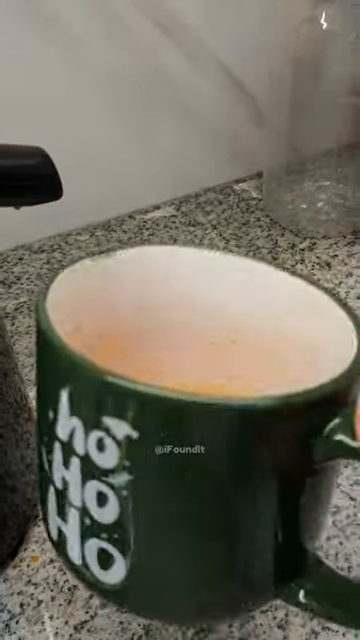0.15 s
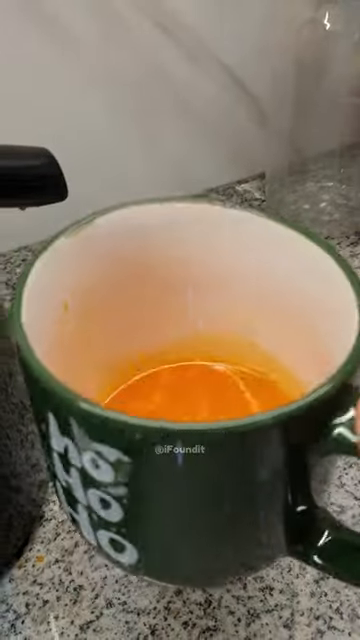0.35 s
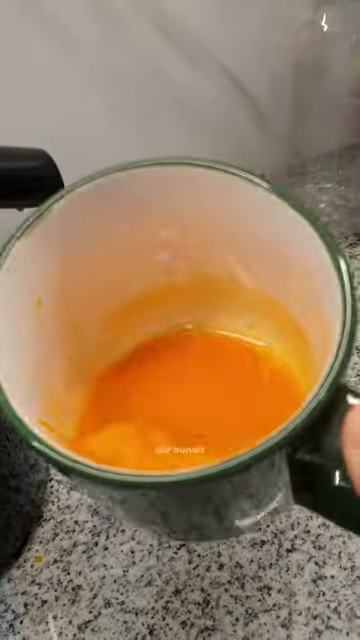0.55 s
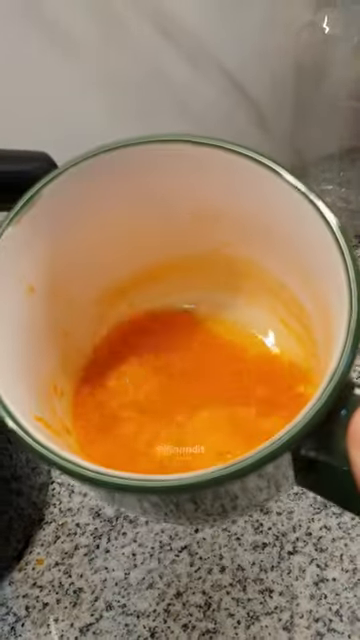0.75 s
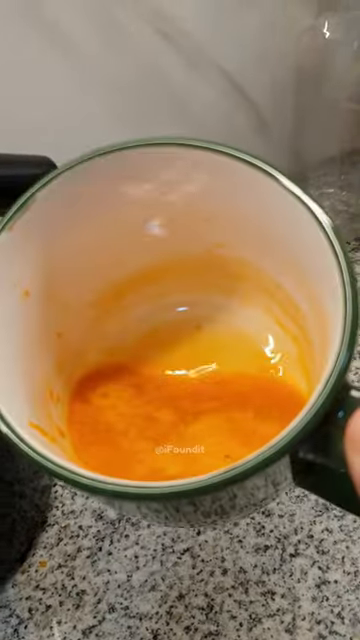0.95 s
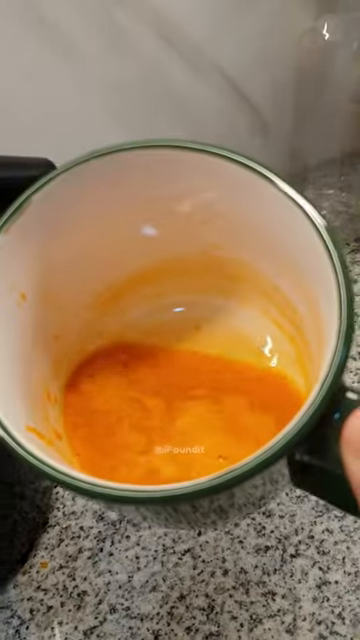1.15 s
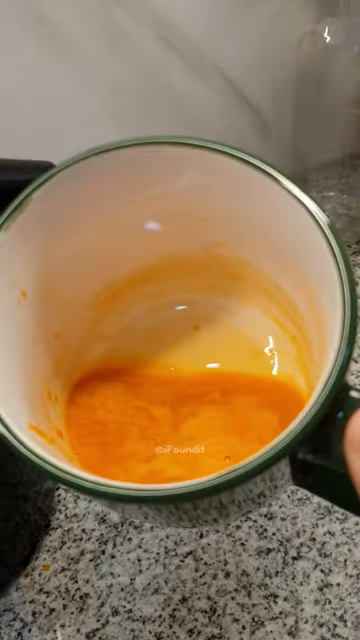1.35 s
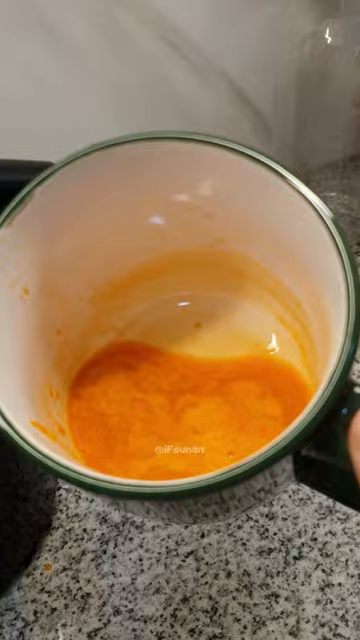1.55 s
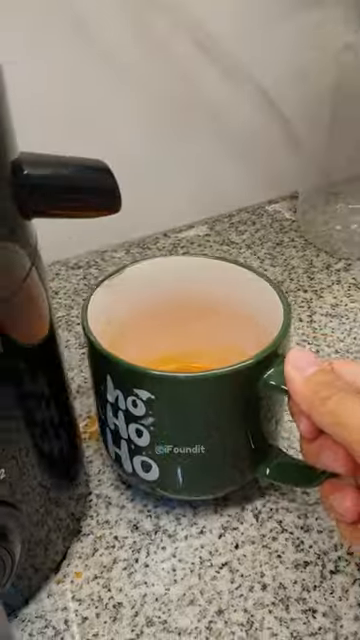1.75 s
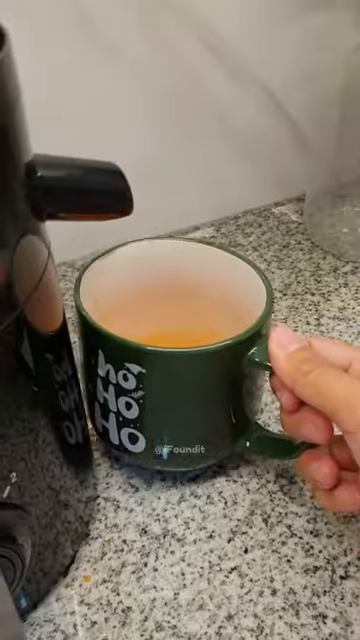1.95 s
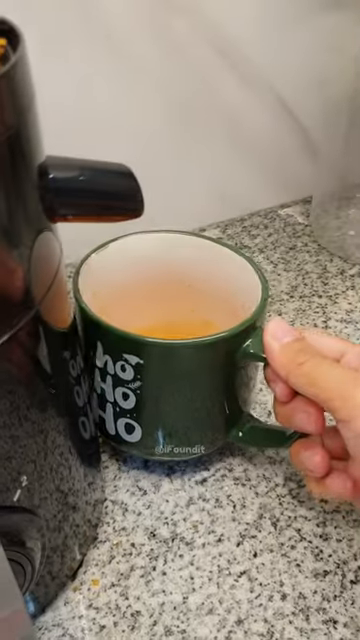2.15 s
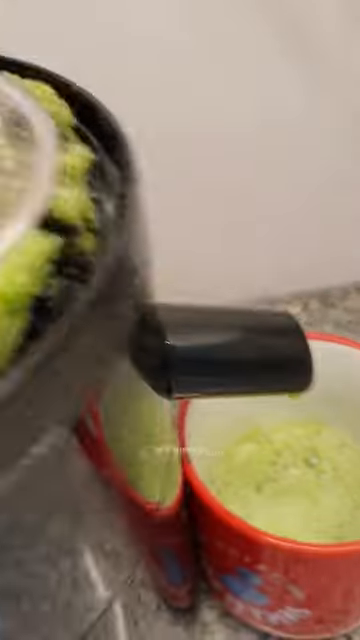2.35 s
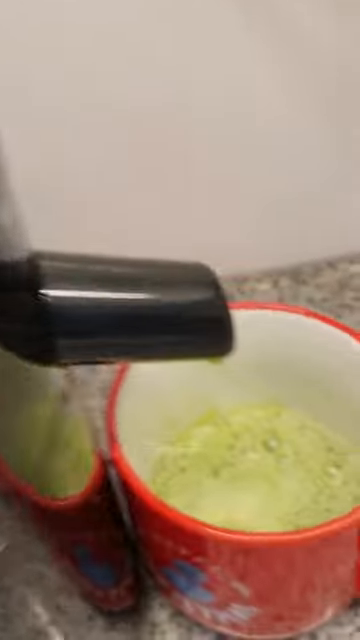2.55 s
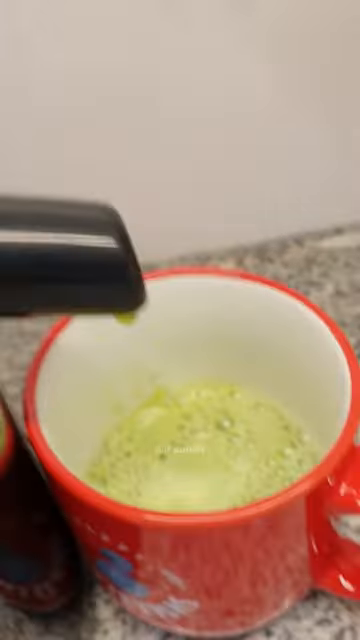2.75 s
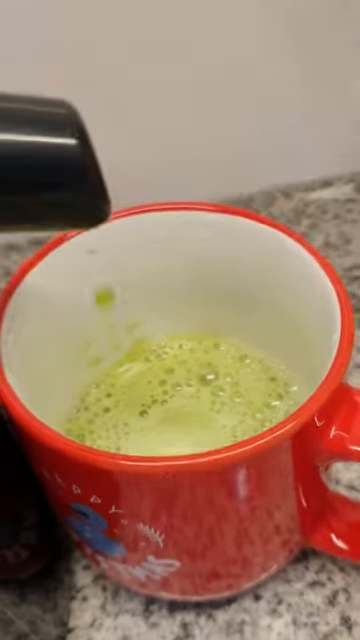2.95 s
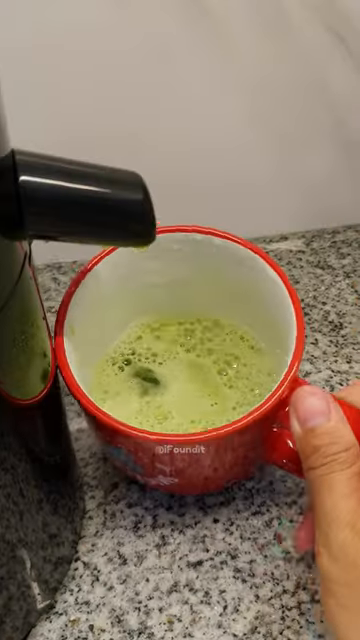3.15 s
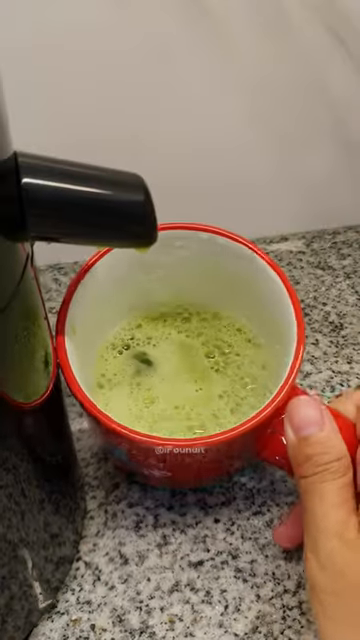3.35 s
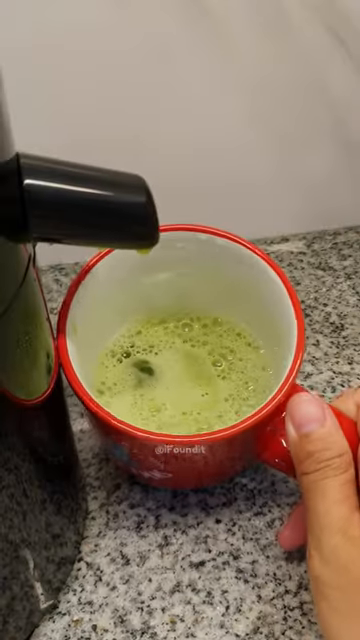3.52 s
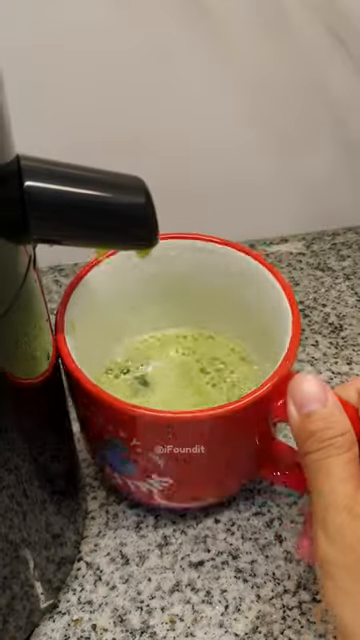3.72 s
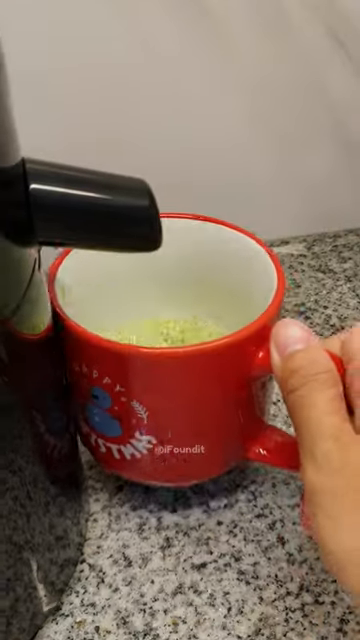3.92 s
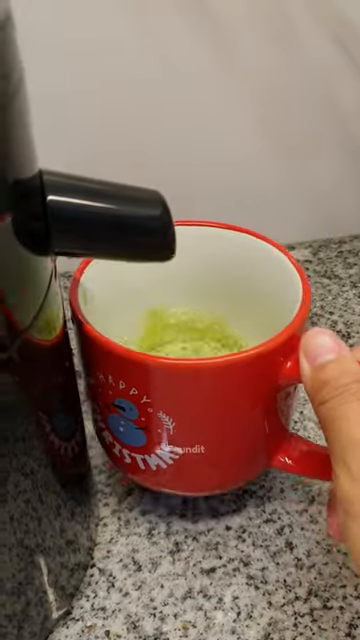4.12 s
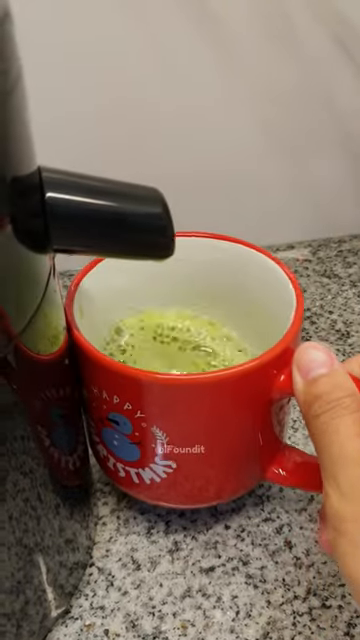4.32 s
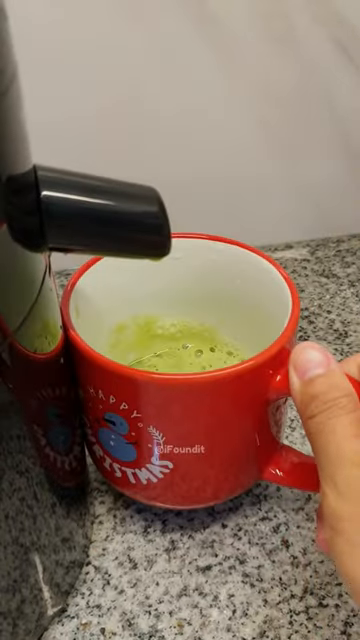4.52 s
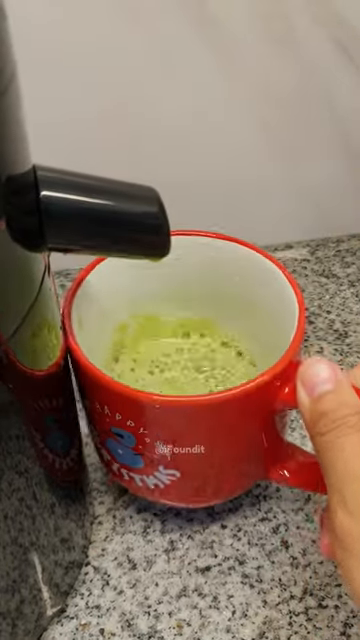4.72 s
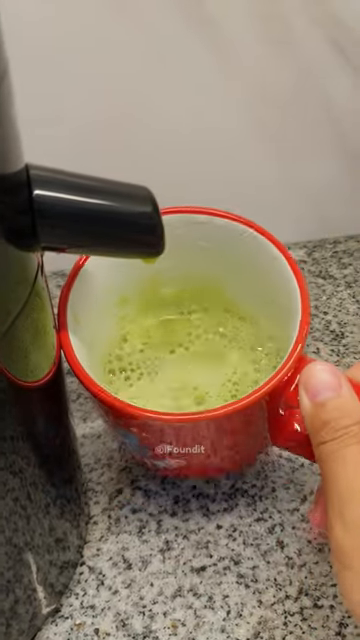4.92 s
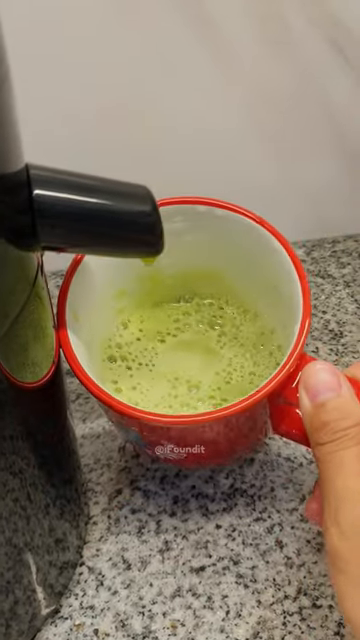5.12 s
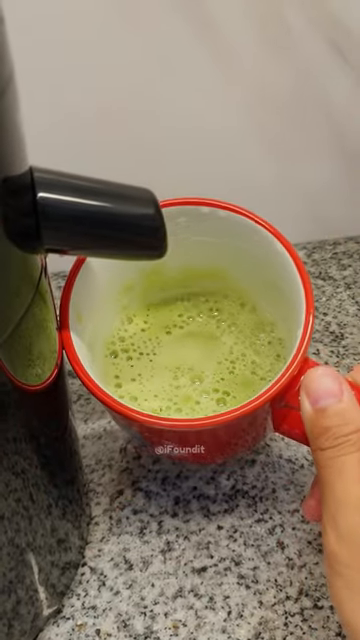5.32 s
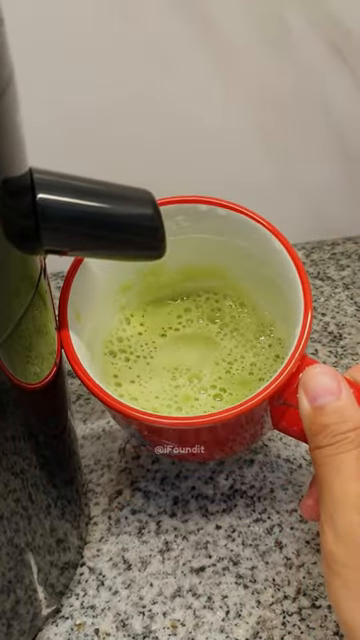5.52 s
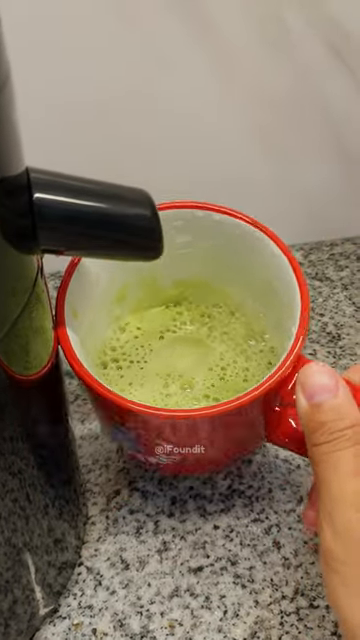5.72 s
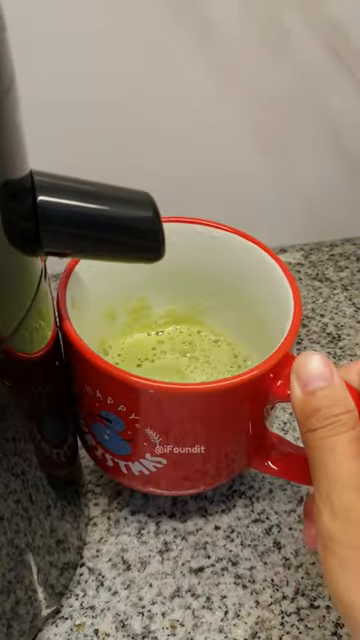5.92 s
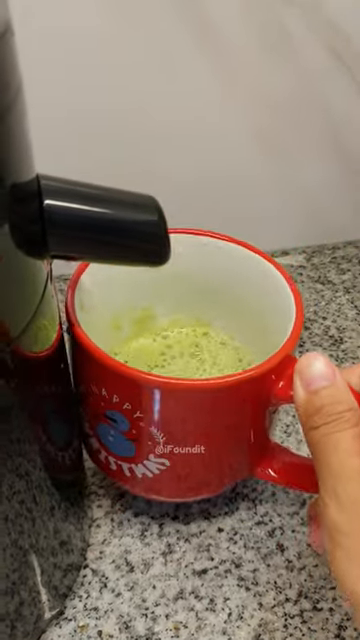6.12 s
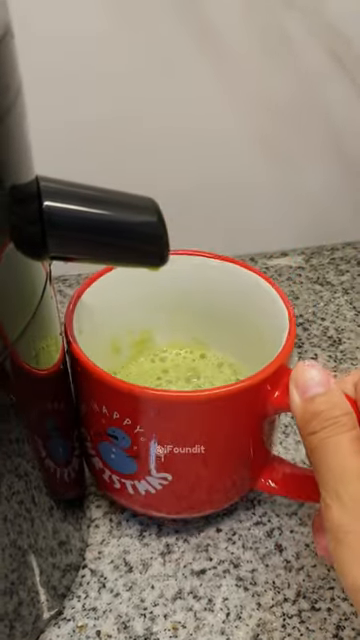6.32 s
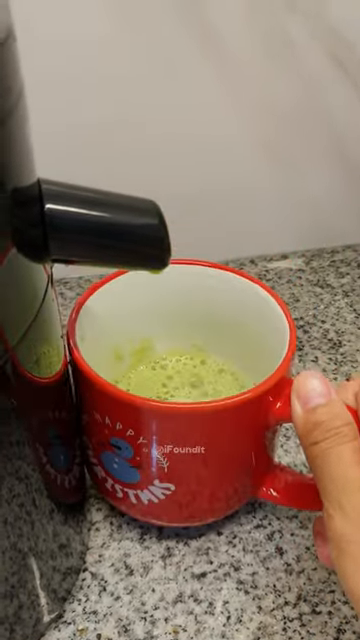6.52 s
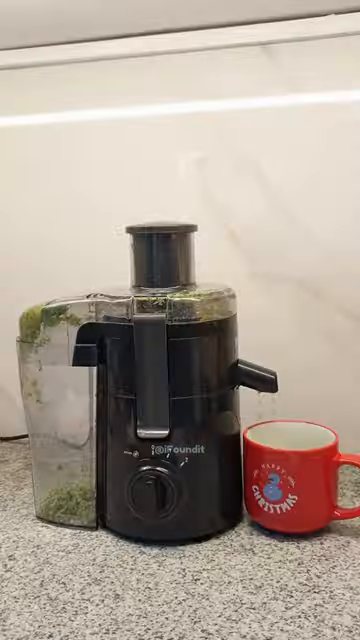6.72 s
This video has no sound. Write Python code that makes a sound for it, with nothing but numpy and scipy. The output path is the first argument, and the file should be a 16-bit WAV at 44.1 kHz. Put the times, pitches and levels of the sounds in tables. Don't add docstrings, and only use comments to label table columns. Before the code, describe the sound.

Soft microphone hiss, low rumble and a thin fridge hum underlie close mug handling on a stone counter. After a quiet opening come bright ceramic taps and a muted bump, then gritty little drags and a cluster of solid knocks with a boomy cabinet undertone. A long near-quiet stretch with faint rubbing leads to one hard ceramic slam and rattling bounces, heard close with short kitchen reverberation.

```python
import sys
import numpy as np
from scipy import signal
from scipy.fft import rfft, irfft
from scipy.io import wavfile
from scipy.ndimage import uniform_filter1d

SR = 44100
rng = np.random.default_rng(int(sys.argv[2]) if len(sys.argv) > 2 else 0)


def bounce(signal):
    frames = np.transpose(np.atleast_2d(signal))
    limited = np.clip(frames, -1, 1)
    pcm = np.round(limited * 32767).astype(np.int16)
    wavfile.write(sys.argv[1], SR, pcm)


def gain_from_db(level_db):
    decades = np.asarray(level_db, float) / 20
    return 10 ** decades


N = 298551


def evened(x):
    return x / np.sqrt(np.mean(x ** 2) + 1e-20)


def read(points, hz):
    f, value = np.transpose(points)
    return np.interp(np.log(hz + 1), np.log(f + 1), value)


def highpass(x, order, hz):
    return signal.sosfilt(signal.butter(order, hz, "high", fs=SR, output="sos"), x)


def ring(modes, size):
    t = np.arange(size) / SR
    return sum(gain_from_db(db - 60 * t / t60) * np.sin(2 * np.pi * hz * t) for hz, db, t60 in modes)


def colour(x, points, tilt_db=0.):
    hz = np.fft.rfftfreq(len(x), 1 / SR)
    gain_db = read(points, hz) + tilt_db * np.log2(hz / 3000 + .01)
    return irfft(rfft(x) * gain_from_db(gain_db), len(x))


def rub(size, hz, width_hz):
    b, a = signal.iirpeak(hz, hz / width_hz, SR)
    grains = rng.standard_normal(30000)[:size]
    return evened(signal.lfilter(b, a, signal.lfilter(b, a, grains)))


def noise(points, same_points, lean_points, patchy_db, size):
    hz = np.fft.rfftfreq(size, 1 / SR)
    a, b, c, d, patches = rng.standard_normal((4 * N // size + 5, len(hz), 5)).T
    patches = evened(uniform_filter1d(uniform_filter1d(patches, size=5, axis=0), size=6, axis=1))
    same = read(same_points, hz)[:, None]
    lean = gain_from_db(read(lean_points, hz) / 2)[:, None]
    left, other = a + 1j * b, c + 1j * d
    right = same * left + np.sqrt(1 - same ** 2) * other
    z = np.array([left * lean, right / lean])
    z = z * gain_from_db(read(points, hz)[:, None] + patchy_db * patches)
    out = signal.istft(z, nperseg=size, noverlap=size - size // 4)[1][:, :N]
    return out / np.std(out.mean(0))


CUTS = [0, 1.75, 2.393, 3.224, 6.657, 7]


def until_cut(s, size):
    left_s = min(c for c in CUTS if c > s) - s - np.arange(size) / SR
    return np.clip(left_s / .002, 0, 1)


def by_shot(levels_db):
    shot = np.searchsorted(CUTS, np.arange(N) / SR, "right") - 1
    return uniform_filter1d(gain_from_db(levels_db)[shot], size=90)


def add(mix, s, sound, lean_db):
    part = mix[:, round(s * SR):][:, :sound.shape[-1]]
    size = part.shape[1]
    part += sound[..., :size] * until_cut(s, size) * gain_from_db(np.array([[lean_db / 2], [-lean_db / 2]]))


# f/Hz, level/dB per Hz
HISS = [(20, -26.5), (38, -7), (60, 4.5), (168, -12.5), (193, -19.5), (420, -13), (574, -26), (2260, -30),
        (6000, -40), (9000, -48), (10800, -37), (13500, -35), (15700, -38.5), (15950, -74.5)]
# f/Hz, likeness/1
HISS_SAME = [(60, 0.74), (180, 0.85), (550, 0.22), (1650, 0.03), (4970, 0.075), (15000, 1)]
# f/Hz, left-right/dB
HISS_LEAN = [(60, -10.5), (180, -5.5), (550, -4.5), (1650, 2.5), (4970, 1.5), (15000, 1.5)]
# f/Hz, level/dB per Hz
RUMBLE = [(12, -39.5), (20, -28.5), (45, 1), (80, 5), (140, -3), (229, -11.5), (323, -19), (455, -15),
          (630, -33.5), (1500, -42), (3300, -51.5)]
SHOT_RUMBLE_DB = [-97, -71.5, -59.5, -61.5, -82.5]
# t/s, half length/s, level/dB
PASSES = [(2.903, 0.5, -64), (4.45, 0.25, -59), (5.952, 1, -60.5)]


def background():
    hiss = noise(HISS, HISS_SAME, HISS_LEAN, patchy_db=2.9, size=1024)
    far = noise(RUMBLE, [(20, .95)], [(20, -1.2)], patchy_db=2.5, size=2048)
    t = np.arange(N) / SR
    passes = sum(gain_from_db(db) * np.exp(-((t - s) / half) ** 2) for s, half, db in PASSES)
    passes = passes * (t < CUTS[-2])
    return gain_from_db(-67.5) * hiss + far * np.hypot(by_shot(SHOT_RUMBLE_DB), passes)


SHOT_HUM_DB = [-72.5, -66, -67, -65.5, -100]


def fridge():
    hum_hz, lean_db, waver_rad, flutter_db = 357, -17.5, 0.13, -1.5
    waver, flutter = (evened(uniform_filter1d(v, size=6000)) for v in rng.standard_normal((2, N)))
    phase = 2 * np.pi * hum_hz * np.arange(N) / SR + waver_rad * waver
    line = np.sqrt(2) * np.sin(phase) * gain_from_db(flutter_db * flutter)
    return 1.526 * line * by_shot(SHOT_HUM_DB) * gain_from_db(np.array([[lean_db], [0]]))


# t/s, peak level/dB, scuff
# t60/s, brightness/dB per octave, left-right/dB
SLAPS = [(1.755, -43, 0.031, 3, 6), (2.139, -31.5, 0.072, -0.5, -1), (2.3883, -59.5, 0.051, -0.5, -1),
         (3.357, -64, 0.054, 3, 5), (3.2204, -45.5, 0.042, 2.5, -1.5), (4.0094, -21, 0.085, 0, 2),
         (4.3237, -23, 0.09, -0.5, -3), (4.3496, -24, 0.04, -1.5, 1), (4.5232, -37.5, 0.16, -2.5, -1.5),
         (4.563, -41, 0.023, -3, -12), (4.736, -42, 0.11, -3.5, -8), (6.4466, -10.5, 0.055, -3.5, 5.5)]
# f/Hz, level/dB per Hz
SLAP_COLOUR = [(240, -21), (500, -8), (700, -8), (1050, 5), (1450, -10.5), (2200, -7), (2850, -3),
               (3500, -12), (4350, -11), (5500, -17.5), (8500, -22), (11500, -18.5), (15500, -36),
               (16500, -72)]


def slaps():
    out, t = np.zeros((2, N)), np.arange(8192) / SR
    for s, db, t60, bright_db, lean_db in SLAPS:
        grit = rng.standard_normal((2, len(t))) * gain_from_db(2.03 * rng.exponential(1, len(t)))
        shared, own = (evened(colour(g, SLAP_COLOUR, bright_db)) for g in grit)
        ports_grit = shared + 0.43 * own * np.array([[1], [-1]])
        rise = np.minimum(t / 0.0027, 1)
        add(out, s, gain_from_db(db - 9.5 - 60 * t / t60) * rise * ports_grit, lean_db)
    return out


def mug(taps, pair, wall, contact_s):
    tick_db = -10
    out, t = np.zeros((2, N)), np.arange(6000) / SR
    for s, db, hz, lean_db, hard_db in taps:
        width_s = contact_s * gain_from_db(-.3 * hard_db)
        push = np.exp(-(t[:100] / width_s - 2.5) ** 2)
        detune = rng.uniform(0.93, 1.015, len(wall))
        low, high = ([(hz * ratio, d, t60)] for ratio, d, t60 in pair)
        upper_modes = [(f * k, d + hard_db, t60) for (f, d, t60), k in zip(wall, detune)]
        upper = ring(upper_modes, len(t)) * (1 - np.exp(-t / 0.00091))
        upper = highpass(upper, 2, 800)
        clink = np.convolve(ring(low, len(t)) - ring(high, len(t)) - upper, push)
        clink[:len(push)] -= gain_from_db(tick_db + 2 * hard_db) * push * push.sum()
        add(out, s - 2.5 * width_s, gain_from_db(db) * clink / abs(clink).max(), lean_db)
    return out


# t/s, peak level/dB, main ring f/Hz, left-right/dB, upper-mode hardness/dB
GREEN_TAPS = [(1.757, -26.5, 762, 2.5, 8), (1.765, -34.5, 1048, 0, 2.5), (1.777, -28.5, 840, 4, 0),
              (1.79, -37, 900, 0, -8), (1.801, -39, 878, -1.5, -5.5), (1.86, -20, 855, -3.5, -3),
              (1.888, -55, 867, -2, -27.5), (1.917, -26.5, 857, -4, -13), (1.984, -36.5, 864, -3, -28.5),
              (1.995, -43.5, 814, -1, -28), (2.006, -40, 822, -5, -29), (2.193, -35, 844, -4.5, -11.5)]
NUDGES = [(2.141, -38, 454, -11.5, -23)]
# ratio to main ring/1, level/dB, t60/s
GREEN_PAIR = [(.945, 2, 0.048), (1.054, 10, 0.029)]
# f/Hz, level/dB, t60/s
GREEN_WALL = [(1290, -15, 0.031), (1320, 1.5, .025), (1545, -17, 0.072), (1910, -9, 0.056),
              (2012, -15.5, 0.032), (2370, -17, 0.023), (2700, -22, 0.025)]


def green_mug():
    return mug(GREEN_TAPS + NUDGES, GREEN_PAIR, GREEN_WALL, contact_s=0.0001)


# t/s, length/s, f/Hz, width/Hz, level/dB
WHISPERS = [(1.757, 0.043, 5970, 1190, -78), (1.986, 0.084, 10400, 1390, -76.5),
            (2.351, 0.032, 10000, 1500, -82.5), (2.7, .28, 610, 90, -75), (3.141, 0.083, 6930, 1146, -78.5),
            (3.171, 0.14, 4140, 984, -71), (4.93, 0.099, 7940, 406, -92), (5.201, 0.2, 8200, 300, -94.5),
            (6.036, 0.21, 3530, 700, -83.5), (6.075, 0.11, 4075, 60, -76.5),
            (6.728, 0.019, 3470, 200.3, -81)]


def whispers():
    glaze_hz, glaze_width_hz, glaze_db, glaze_t60_s = 9900, 980, -46.5, .05
    glaze_share = 0.73
    out, t = np.zeros((2, N)), np.arange(6000) / SR
    for s, length_s, hz, width_hz, db in WHISPERS:
        size = int(length_s * SR)
        swell = signal.windows.tukey(size, 0.15)
        add(out, s, gain_from_db(db) * rub(size, hz, width_hz) * swell, -1.5)
    for s, db, *_ in GREEN_TAPS:
        decay = gain_from_db(glaze_db + glaze_share * db - 60 * t / glaze_t60_s)
        add(out, s, decay * rub(len(t), glaze_hz, glaze_width_hz), -1.5)
    return out


# t/s, blow level/dB, low, middle, high cabinet mode level/dB
BOOMS = [(1.7601, -47, -14, -15.5, -1.5), (2.018, -51.5, 3, 0.5, -1.5), (2.142, -37, -7.5, 2, -11),
         (3.36, -45.5, -6, 19.5, 6), (4.012, -21.5, -11, 0, 2.5), (4.322, -27, -13.5, -2.5, 5),
         (4.351, -26.5, -5.5, -9.5, -3.5), (4.525, -32.5, -4.5, 1.5, -2), (4.565, -43, 2, 6.5, -26),
         (4.734, -35, -4.5, 2, -26), (4.781, -41.5, -17, -4, -5), (6.447, -39.5, -3, -6, 8),
         (6.499, -39.5, -15.5, 14.5, 12), (6.56, -32.5, -10.5, 7, 5)]
# t/s, blow level/dB
JUDDER = [(5.985, -40.5), (6.003, -36), (6.022, -38), (6.045, -39)]
# low, middle, high cabinet mode level/dB
JUDDER_MODES_DB = (-9, 11, -17)
# f/Hz, t60/s
CABINET = [
    (120, 0.41),
    (166, 0.21),
    (284, 0.15),
]
# f/Hz, level/dB, t60/s
PANELS = [(95, -17, 0.094), (143.1, -8, 0.27), (200.8, -6.5, 0.11), (367.3, -9.5, 0.1), (227.3, -3.5, 0.11),
          (467.7, -24, 0.26)]


def booms():
    green_blow_s, red_blow_s = .004, 0.012
    out, t = np.zeros((2, N)), np.arange(20000) / SR
    jolts = [(*jolt, *JUDDER_MODES_DB) for jolt in JUDDER]
    for s, db, *shares_db in BOOMS + jolts:
        modes = [(hz, d, t60) for (hz, t60), d in zip(CABINET, shares_db)] + PANELS
        boom = np.zeros(len(t))
        for mode, lag in zip(modes, rng.integers(0, 150, len(modes))):
            boom += rng.choice([-1, 1]) * np.roll(ring([mode], len(t)), lag)
        boom *= np.minimum(t / (green_blow_s if s < CUTS[2] else red_blow_s), 1)
        add(out, s, gain_from_db(db) * boom / abs(boom).max(), .5)
    return out


# t/s, peak level/dB, main ring f/Hz, left-right/dB, upper-mode hardness/dB
RED_TAPS = [(3.358, -33.5, 860, -2.5, -24), (3.365, -33.5, 940, 11.5, -26), (4.011, -38, 970, -5, 1),
            (4.324, -37.5, 1130, 7, 1), (4.531, -56, 1124, -4, -9), (4.741, -48.5, 830, 8, -38),
            (6.447, -1, 945, -1.5, -6), (6.465, -35, 922, 6.5, -1), (6.5, -11, 927, 1.5, -13),
            (6.538, -17.5, 943, 3, -17.5), (6.552, -27, 868, -8, -27), (6.559, -24.5, 894, 2, -38.5),
            (6.571, -29, 910, -0.5, -40)]
# ratio to main ring/1, level/dB, t60/s
RED_PAIR = [(0.961, -0.5, 0.029), (1.104, 0.6, 0.016)]
# f/Hz, level/dB, t60/s
RED_WALL = [(1240, -42.5, 0.012), (1478, 7.5, 0.014), (1750, -29.5, 0.032), (1995, 0, 0.023),
            (2190, -3.5, 0.032), (2425, 14, 0.0076), (2817, 3.5, 0.012), (3030, -12, 0.017),
            (3300, -28, .02), (3740, -42, .03), (4355, -15, 0.016), (4990, -11, 0.027), (5536, -6.5, 0.019),
            (7620, -15.5, 0.017)]


def red_mug():
    return mug(RED_TAPS, RED_PAIR, RED_WALL, contact_s=.00004)


# t/s, length/s, pressure level/dB, fine grit above it/dB
LIGHT_DRAGS = [(3.601, 0.08, -66, -1), (3.685, 0.041, -65, -9.5), (3.721, 0.057, -83, 8.5)]
LOADED_DRAGS = [(5.14, .09, -79.5, -12), (5.983, .075, -67.5, -19), (6.145, .06, -75.5, -25),
                (6.216, .02, -78.5, -20.5), (6.736, .04, -77, -13)]
# f/Hz, level/dB per Hz
DRAG_COLOURS = [
    [(350, -65), (600, -9), (692, -28), (853, -1.5), (977, 5), (1480, -24), (1590, -30), (2230, -12.5),
     (3600, -36), (4680, -71), (7920, -120)],
    [(350, -36), (600, -14.5), (757, -16.5), (969, -4.5), (1390, -16), (2380, -15.5), (2770, -12),
     (3600, -32.5), (4680, -45), (7920, -120)],
]
# f/Hz, level/dB per Hz
GRIT_COLOUR = [(2120, -40), (3600, -37), (4390, -1), (5410, 0), (7730, -13), (9150, 0.5), (10600, -5),
               (11800, 0), (14500, -23)]


def drags():
    grip_s, let_go_s = 0.0046, 0.011
    sag_db_per_s, grit_sag_db_per_s = -46.5, -120
    ticks_per_s = 6000
    clumps = gain_from_db(1.1 * evened(uniform_filter1d(rng.standard_normal(N), size=300)))
    ticks = clumps * rng.standard_normal(N) * (rng.random(N) < ticks_per_s / SR)
    light, loaded, grit = (evened(colour(ticks, c)) for c in DRAG_COLOURS + [GRIT_COLOUR])
    out = np.zeros(N)
    for body, strokes in ((light, LIGHT_DRAGS), (loaded, LOADED_DRAGS)):
        for s, length_s, db, fine_db in strokes:
            t = np.arange(N) / SR - s
            press = np.clip(np.minimum(t / grip_s, 1 + (length_s - t) / let_go_s), 0, 1) ** 2
            since = np.clip(t, 0, 1)
            fine = gain_from_db(fine_db + grit_sag_db_per_s * since) * grit
            out += press * gain_from_db(db + sag_db_per_s * since) * (body + fine)
    return out * gain_from_db(np.array([[-3.], [2.5]]))


# f/Hz, t60/s
KITCHEN = [(100, 0.34), (400, 0.63), (900, 0.27), (1800, 0.42), (3000, 0.3), (3800, .28), (8000, 0.32),
           (16000, 0.4)]


def echoes(wet_db):
    taps = np.zeros((2, SR // 2))
    slots = np.arange(150, SR // 2 - 20, 20)
    at = slots + rng.integers(0, 20, (2, len(slots)))
    np.put_along_axis(taps, at, rng.choice([-1., 1.], at.shape), 1)
    hz, t, z = signal.stft(taps, SR, nperseg=512)
    apart = np.sqrt(hz / (hz + 350))[:, None]
    z = np.array([z[0], apart * z[1] + np.sqrt(1 - apart ** 2) * z[0]])
    decay = gain_from_db(-60 * t / read(KITCHEN, hz)[:, None])
    tail = signal.istft(z * decay, SR, nperseg=512)[1]
    tail *= np.minimum(np.arange(tail.shape[1]) / SR / 0.00873, 1)
    return tail * gain_from_db(wet_db) / np.linalg.norm(tail[0])


def kitchen(dry, wet_db):
    shifts_per_s = 9
    tails, out = [echoes(wet_db), echoes(wet_db)], dry.copy()
    turn = 2 * np.pi * shifts_per_s * np.arange(N) / SR
    feeds = dry.mean(0) * np.array([np.cos(turn), np.sin(turn)])
    for start, end in zip(CUTS, CUTS[1:]):
        shot = slice(round(start * SR), min(round(end * SR), N))
        size = shot.stop - shot.start
        for feed, tail in zip(feeds, tails):
            wet = signal.fftconvolve(feed[None, shot], tail, axes=1)[:, :size]
            out[:, shot] += wet * until_cut(start, size)
    return out


# f/Hz, left-right/dB
PORT_LEAN = [(100, 1), (1000, -3), (2500, -5.5), (5000, 0), (9000, 4.5), (14000, 1.5)]
# f/Hz, phase/rad
PORT_LEAD = [(150, 0.23), (600, 0.96), (1500, 1.28), (2400, 1.3), (3400, 0.71), (4400, -1.5), (6300, 0.12)]


def ports(x):
    hz = np.fft.rfftfreq(N, 1 / SR)
    half = gain_from_db(read(PORT_LEAN, hz) / 2) * np.exp(.5j * read(PORT_LEAD, hz))
    return irfft(rfft(x) * np.array([half, 1 / half]), N)


def scene():
    steady = background() + fridge()
    airborne = slaps() + green_mug() + whispers() + red_mug() + drags()
    airborne = highpass(airborne, 3, 85)
    low = highpass(booms(), 2, 80)
    near = kitchen(airborne + 0.47 * low, wet_db=-8.0)
    near = near + 0.57 * low
    return ports(near) + steady


def roll_off(x):
    return signal.sosfilt(signal.butter(12, 16460, fs=SR, output="sos"), x)


def record(dry):
    ceiling = .95
    mix = ceiling * np.tanh(dry / ceiling)
    return roll_off(mix)


dry = scene()
out = record(dry)
bounce(out)
```